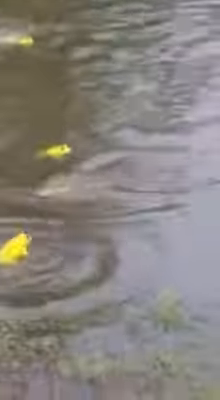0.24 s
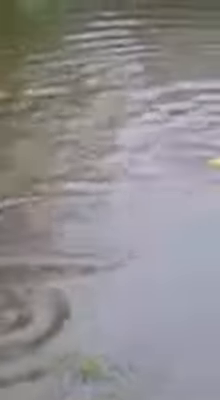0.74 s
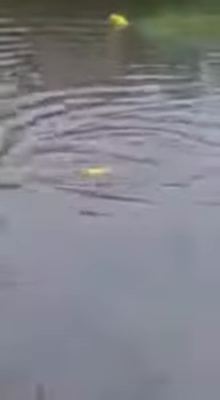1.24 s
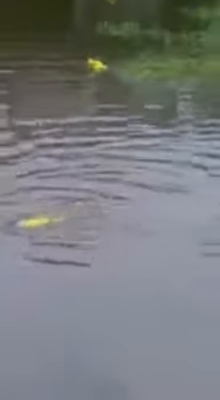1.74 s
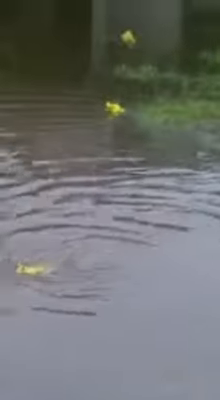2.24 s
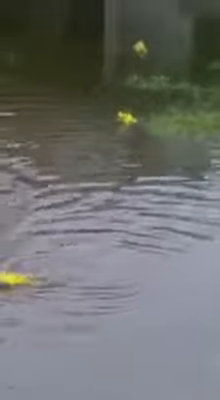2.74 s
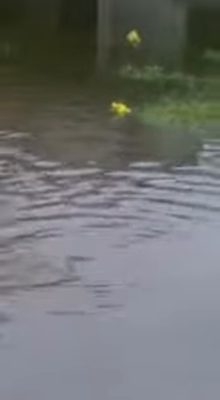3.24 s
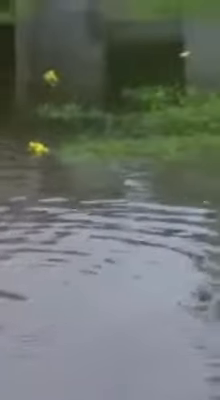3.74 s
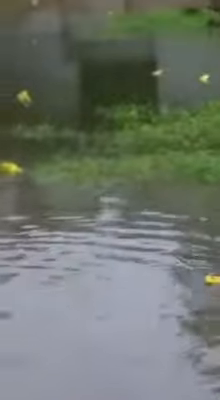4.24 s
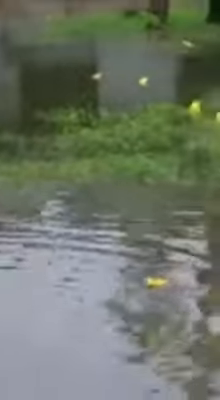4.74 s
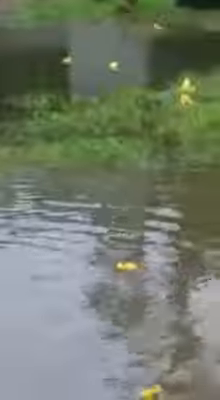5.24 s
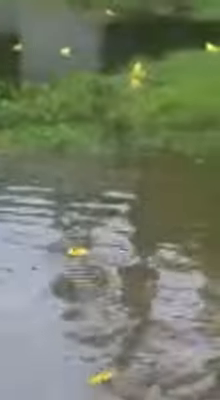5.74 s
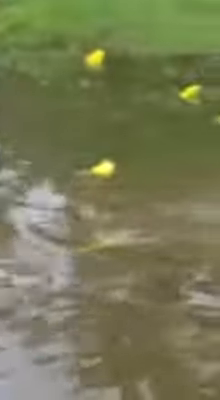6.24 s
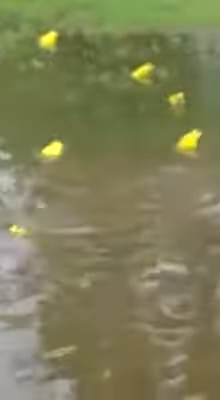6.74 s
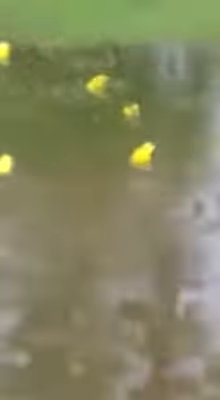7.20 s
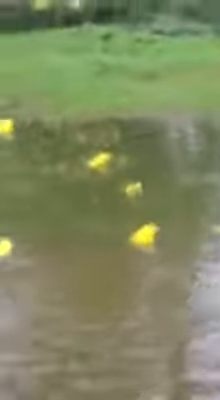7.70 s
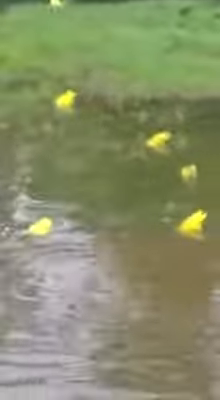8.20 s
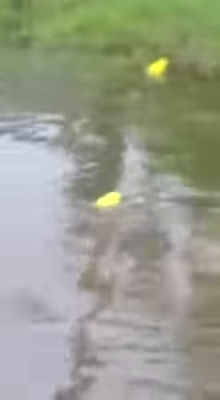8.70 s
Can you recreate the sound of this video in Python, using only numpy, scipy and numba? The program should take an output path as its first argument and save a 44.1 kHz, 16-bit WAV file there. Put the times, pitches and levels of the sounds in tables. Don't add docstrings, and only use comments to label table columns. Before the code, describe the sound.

Outdoor pond full of yellow frogs, heard on a hand-held phone. Croaking is under way immediately: short, rattling, mid-pitched honks from larger and smaller frogs, crowded at first, thinning briefly around four seconds, then thickening again. Behind them a reverberant carpet swells and dips. High thin insect rasp, soft rustle and low air rumble continue. A blunt handling knock comes just after seven seconds, a barely audible one later, while croaks go on to the end.

```python
import sys
import numpy as np
from scipy import signal
from scipy.fft import rfft, irfft
from scipy.io import wavfile
from scipy.ndimage import uniform_filter1d
from numba import njit

SR = 44100
rng = np.random.default_rng(int(sys.argv[2]) if len(sys.argv) > 2 else 0)


def gain_from_db(level_db):
    decades = np.asarray(level_db, float) / 20
    return 10 ** decades


def persist_wave(psi):
    counts = np.round(np.clip(psi, -1, 1) * 32767).astype(np.int16)
    wavfile.write(sys.argv[1], SR, np.atleast_2d(counts).T)


N = 395136
SECONDS = np.arange(N) / SR


# first click in seconds, click rate in Hz, length in seconds, level in dB,
# throat against sac in dB.
LARGE_NEAR_CROAKS = [
    (.124, 66.5, 0.28, -31, -11.5),
    (.941, 62.6, 0.17, -31.5, -13),
    (1.504, 69, 0.14, -40, -15),
    (1.746, 59.53, 0.25, -26, -9.5),
    (2.523, 55.9, 0.14, -29.5, -8.5),
    (4.43, 61.34, .25, -37, -11),
    (8.311, 65.7, 0.2, -32.5, -14),
    (8.835, 58.9, 0.093, -32, -14),
]
LARGE_FACING_CROAKS = [
    (.426, 59.7, .27, -30, -11),
    (1.156, 63.1, .25, -29, -7),
    (2.301, 57.98, .29, -33, -8),
    (4.4, 64.33, 0.18, -33, -5.5),
    (4.739, 63.5, 0.099, -37.5, -14.5),
    (4.962, 63.8, .19, -32.5, -5.5),
    (5.473, 63.83, 0.25, -30.5, -8),
    (6.022, 60.37, 0.22, -33.5, -13),
    (6.316, 65.5, 0.21, -32, -7),
    (6.809, 63.5, 0.23, -30.5, -9.5),
]
LARGE_MID_CROAKS = [
    (.708, 65.55, .17, -35.5, -8.5),
    (2.747, 54.5, 0.12, -34.5, -21),
    (2.912, 58.5, 0.13, -40.5, -10.5),
    (3.17, 60.53, 0.16, -34.5, -11.5),
    (3.447, 62.96, .26, -39.5, -7),
    (4.188, 62.2, 0.21, -34, -11),
    (6.585, 62.35, 0.15, -41.5, -9),
    (7.573, 59.1, 0.29, -36.5, -10),
    (8.529, 58.6, 0.19, -35.5, -7.5),
]
LARGEST_CROAKS = [
    (2.094, 59.5, 0.22, -37, -6),
    (5.33, 60.3, 0.14, -48, -1),
    (5.751, 64.43, 0.25, -37, -10),
    (7.2, 59.1, 0.1, -38, -2.5),
    (8.1, 58.3, 0.2, -46, 5.5),
    (8.271, 57.3, .22, -43, 3.5),
]
SMALL_NEAR_CROAKS = [
    (.153, 64.2, 0.24, -34, -7),
    (.426, 62.4, .24, -29.5, -7),
    (0.946, 59.4, 0.2, -31.5, -9),
    (1.191, 65.8, 0.2, -31.5, -15.5),
    (1.475, 62.8, 0.28, -31, -14.5),
    (2.0, 66.8, .29, -29.5, -14),
    (2.392, 60.4, 0.4, -33.5, -6.5),
    (5.447, 62.1, .25, -29, -7),
    (6.554, 62.16, 0.23, -30, -14),
    (7.391, 61.3, 0.26, -37.5, -7.5),
]
SMALL_FACING_CROAKS = [
    (1.748, 62.34, 0.28, -35.5, -3),
    (3.129, 67.2, 0.18, -31.5, -16.5),
    (3.592, 67.77, 0.23, -33.5, -11),
    (3.909, 70.8, 0.081, -46.5, -0.5),
    (4.147, 65.76, 0.21, -31.5, -24),
    (5.194, 63.75, 0.17, -32, -18),
]
SMALL_MID_CROAKS = [
    (2.953, 59.4, .16, -36.5, -10),
    (3.472, 56.6, 0.11, -43, -4.5),
    (3.866, 65.4, 0.24, -37, -5),
    (4.448, 63.8, 0.11, -40.5, -5),
    (5.026, 63.4, 0.11, -39, -16.5),
    (6.841, 64.5, 0.14, -36.5, -9),
    (7.073, 65.5, .12, -36.5, -7),
    (7.135, 59.76, 0.23, -38, -2.5),
    (8.119, 64.3, 0.13, -36.5, -3.5),
    (8.535, 63.4, 0.27, -32.5, -13),
]
MIDDLING_CROAKS = [
    (4.711, 65.5, 0.22, -37.5, -7.5),
    (5.763, 62, 0.21, -31, -14),
    (6.04, 60, 0.15, -35, -9),
    (6.32, 58.44, 0.18, -34.5, -11),
    (7.6, 62.3, 0.19, -40, -6),
    (7.778, 62.46, 0.22, -32, -12),
]
# sac resonance in Hz, throat resonance in Hz, chest in dB, head in dB.
FROG_GROUPS = [
    (1436, 385, 2, -4),
    (1500, 385, 1, 2),
    (1455, 385, -2, -7),
    (1314, 350, 3, 7.5),
    (1846, 400, -3, -8),
    (1786, 400, 0, 1),
    (1908, 400, -1, -7),
    (1614, 390, -1.5, -4.5),
]
USUAL_THROAT_DB, CHEST_PER_THROAT = -8.5, 0.55
ECHO_DB, ECHO_PER_DB = -13, -.5


def near_frogs():
    out = np.zeros((1, N))
    croaks = (LARGE_NEAR_CROAKS, LARGE_FACING_CROAKS, LARGE_MID_CROAKS, LARGEST_CROAKS,
              SMALL_NEAR_CROAKS, SMALL_FACING_CROAKS, SMALL_MID_CROAKS, MIDDLING_CROAKS)
    for calls, (sac_hz, throat_hz, chest_db, head_db) in zip(croaks, FROG_GROUPS):
        for s, rate, length, db, throat_db in calls:
            train = clicks(length, rate, jitter_s=.0002, scatter_db=2, flutter_s=.0023, flutter_db=-9)
            filling_hz = sac_hz * np.linspace(1.03, .97, train.shape[1])
            turned_db = CHEST_PER_THROAT * (throat_db - USUAL_THROAT_DB)
            call = voice(train, filling_hz, throat_db, chest_db + turned_db, head_db, throat_hz)
            wet_db = ECHO_DB + ECHO_PER_DB * (db + 30)
            add(out, s - .0072, gain_from_db(db) * echoes(call, .15, wet_db))
    return out[0]


THROAT_LEAD = 190


def clicks(length_s, rate, jitter_s, scatter_db, flutter_s, flutter_db):
    chance = rng.standard_normal((40, 6))
    count = int(np.clip(length_s * rate, 2, 40))
    chance = chance[:count]
    step = np.arange(count)
    swell = np.sin(np.pi * (step + 1) / (count + .6)) ** .7
    beat = .006 + step / rate + .00005 * (step - count / 2) ** 2
    out = np.zeros((2, int((length_s + .06) * SR)))
    breath_s = beat + .4 * jitter_s * chance[:, 0]
    out[0, (breath_s * SR).astype(int) - THROAT_LEAD] = swell ** .5 * gain_from_db(-6 * step / count)
    for k in range(3):
        snap_s = beat + jitter_s * chance[:, 0] + (k - 1) * flutter_s * (1 + .25 * chance[:, k])
        at = np.clip(snap_s * SR, 0, out.shape[1] - 1).astype(int)
        out[1, at] += swell * gain_from_db(scatter_db * chance[:, 3 + k] + abs(k - 1) * flutter_db)
    return out


# frequency in Hz, width in Hz, level in dB.
CHEST_MODES = [(873, 390, -18), (1038.6, 360, -10)]
HEAD_MODES = [(2115, 500, -10.5), (2635, 590, -21.5), (3773, 400, -31.5), (2297, 2800, -32)]
THROAT_HZ, THROAT_WIDTH_HZ = 399, 220
SAC_WIDTH_HZ, OVERTONE_WIDTH_HZ, OVERTONE_DB = 310, 260, -15


def voice(train, sac_hz, throat_db, chest_db, head_db, throat_hz=THROAT_HZ):
    breath, snaps = train
    sac = twice(snaps, sac_hz, SAC_WIDTH_HZ)
    unit = np.sqrt(np.mean(sac ** 2))
    throat = twice(breath, throat_hz, THROAT_WIDTH_HZ)
    throat = twice(throat, throat_hz, 2 * THROAT_WIDTH_HZ)
    throat = level(throat, 0) * gain_from_db(throat_db) * unit
    chest = gain_from_db(chest_db) * modes(snaps, CHEST_MODES)
    overtone = gain_from_db(OVERTONE_DB) * twice(snaps, 1800 + sac_hz, OVERTONE_WIDTH_HZ)
    head = gain_from_db(head_db) * (overtone + modes(snaps, HEAD_MODES[1:])) + modes(snaps, HEAD_MODES[:1])
    return (sac + throat + chest + head) / unit


def echoes(x, t60_s, wet_db):
    t = SECONDS[:SR // 5]
    tail = rng.standard_normal(len(t)) * gain_from_db(-60 * t / t60_s) * np.clip(t / 0.0021, 0, 1)
    tail *= gain_from_db(wet_db) / np.linalg.norm(tail)
    tail[0] = 1
    return signal.fftconvolve(np.atleast_2d(x), tail[None], axes=1)


# time in seconds, level in dB, sac resonance in Hz.
FAR_CHORUS = [(0, -19.5, 1836), (.1, -29, 1500), (.6, -23, 1587), (1.05, -29.5, 1500), (1.3, -24.5, 1482),
              (1.75, -22, 1555), (2.4, -23, 1450), (2.9, -29.5, 1500), (3.7, -27.5, 1570),
              (4.4, -31.5, 1500), (4.85, -24, 1738), (5.4, -27, 1578), (6.1, -22, 1695), (6.9, -26, 1611),
              (7.5, -29.5, 1819), (8.05, -25.5, 1744), (8.7, -25, 1708), (8.96, -22, 1617)]
# middle in seconds, depth in dB, length in seconds.
POND_LULLS = [(0.074, -8, 0.1), (0.392, -7, .1), (0.888, -2, 0.027), (1.438, -9, 0.084), (1.976, -8, 0.15),
              (3.342, 0, 0.16), (4.393, -10.5, .16), (4.926, -3.5, 0.16), (5.696, -6.5, 0.072),
              (6.277, -4.5, 0.12), (6.516, -6, 0.054), (6.778, -3, .1), (7.068, -2.5, 0.035),
              (7.304, 0.5, 0.04)]
FAR_USUAL_DB, FAR_USUAL_HZ = -27, 1646
FAR_THROAT_DB, THROAT_STEADY = -12, .35
FAR_CHEST_DB, CHEST_DB_PER_HZ = -1.5, -.015
FAR_HEAD_DB, HEAD_SWELL = -9.5, 0.28


def far_frogs():
    db, sac_hz = columns(FAR_CHORUS)
    for s, depth, length in POND_LULLS:
        db = db + depth * np.exp(-(2 * (SECONDS - s) / length) ** 2)
    throat_db = FAR_THROAT_DB - THROAT_STEADY * (db - FAR_USUAL_DB)
    chest_db = FAR_CHEST_DB + CHEST_DB_PER_HZ * (sac_hz - FAR_USUAL_HZ)
    head_db = FAR_HEAD_DB + HEAD_SWELL * (db - FAR_USUAL_DB)
    out = 0
    for size in (.94, 1.07):
        train = np.full((2, N), 1e-9)
        for s, pace, far in zip(np.arange(0, 9.1, .11), *rng.random((83, 2)).T):
            call = clicks(.22, 57 + 11 * pace, jitter_s=.0004, scatter_db=3, flutter_s=.003, flutter_db=-6)
            add(train, s - .15, gain_from_db(-8 * far) * echoes(call, t60_s=.2, wet_db=-0.5))
        train /= np.sqrt(uniform_filter1d(train ** 2, size=6000, axis=1) + 1e-9)
        out = out + voice(train, size * sac_hz, throat_db, chest_db, head_db)
    return gain_from_db(db - 5.5) * out


# start in seconds, level in dB, ring in Hz, 60 dB decay time in seconds.
FINGER_TAPS = [
    (7.2335, -11, 220, .016),
    (7.2336, -13, 600, .008),
    (7.2432, -11, 150, .024),
    (7.2433, -11, 500, .009),
    (7.244, -13, 110, .04),
    (8.14, -33, 65, .1),
]


def taps():
    out, t = np.zeros(N), SECONDS[:SR // 5]
    for s, db, hz, t60 in FINGER_TAPS:
        swing = np.cos(2 * np.pi * hz * t) * gain_from_db(-60 * t / t60) * np.clip(t / .0004, 0, 1)
        add(out, s - .0005, gain_from_db(db) * swing)
    return out


# start in seconds, length in seconds, level at start in dB, level at end in dB.
KATYDID_PHRASES = [(-.1, .13, -48, -45), (0.195, 0.96, -46.5, -45.5), (1.271, 1.02, -48.5, -44.5),
                   (2.38, 0.58, -48, -50.5), (2.87, 0.59, -44.5, -49), (3.53, 0.62, -50, -50),
                   (3.974, 0.62, -46.5, -48), (4.727, 1.04, -50, -47.5), (5.93, .95, -52, -49.5),
                   (7.06, .83, -54, -56.5), (8.588, .2, -55, -54)]
# frequency in Hz, level in dB.
RASP_SPECTRUM = [(8100, -34), (8250, -7), (8700, -6), (9000, -1.5), (9400, 1.5), (9800, -3), (10300, -13.5),
                 (10800, -36.5)]
RASP_REST_DB, RASP_EDGE_S = -53, 0.037
RASP_FLICKER_DB, RASP_FLICKER_S = -0.06, .08


def katydids():
    power = gain_from_db(2 * RASP_REST_DB)
    for s, length, first_db, last_db in KATYDID_PHRASES:
        gate = np.clip(np.minimum(SECONDS - s, s + length - SECONDS) / RASP_EDGE_S, 0, 1)
        phrase_db = np.interp(SECONDS, (s, s + length), (first_db, last_db))
        power = power + gate * gain_from_db(2 * phrase_db)
    flicker = gain_from_db(RASP_FLICKER_DB * wander(RASP_FLICKER_S))
    return np.sqrt(power) * flicker * coloured(RASP_SPECTRUM)


# start in seconds, peak in dB, centre in Hz, length in seconds.
WATER_TICKS = [(0.64, -46, 7050, 0.035), (2.495, -48, 7000, 0.035), (2.54, -39, 4680, 0.015),
               (0.295, -51.5, 6900, 0.069), (3.223, -52, 6740, .06), (4.19, -54, 6550, 0.051),
               (7.236, -38.5, 9300, .015), (4.172, -41.5, 5830, .03), (6.19, -50, 4570, 0.088),
               (6.553, -49, 4700, 0.068), (6.878, -50, 4660, 0.14), (7.232, -34, 6460, 0.012),
               (7.326, -43, 6400, 0.029), (7.447, -47, 4540, 0.16), (7.864, -46, 4420, 0.21),
               (8.084, -38, 6500, 0.0078), (8.333, -47, 4660, 0.11)]


def splashes():
    out = np.zeros(N)
    for s, db, hz, length in WATER_TICKS:
        burst = rng.standard_normal(min(int(length * SR), 8000))
        burst *= np.hanning(len(burst)) ** .3
        add(out, s, gain_from_db(db + 4) * twice(burst, hz, width_hz=hz ** 2 / 12000))
    return out


# frequency in Hz, level in dB.
RUSTLE_SPECTRUM = [(4200, 12), (5700, 11), (6300, 17.5), (7300, 16.5), (7900, -4), (8300, -5)]
RUSTLE_DB, RUSTLE_FLICKER_DB, RUSTLE_FLICKER_S = -60.5, 1, .06


def rustle():
    flicker_db = RUSTLE_FLICKER_DB * wander(RUSTLE_FLICKER_S)
    return gain_from_db(RUSTLE_DB + flicker_db) * coloured(RUSTLE_SPECTRUM)


# frequency in Hz, level in dB.
AIR_SPECTRUM = [(15, -53), (25, -32.5), (43, -13.5), (102, -10.5), (167, -15), (260, -2), (340, -3.5),
                (570, -120)]
# time in seconds, level in dB.
AIR_LEVEL = [(0, -49), (2.5, -48), (4, -45.5), (6.5, -46), (7.6, -47.5), (8.2, -45), (8.6, -47.5),
             (8.96, -52)]


def open_air():
    return gain_from_db(columns(AIR_LEVEL)[0]) * coloured(AIR_SPECTRUM)


@njit
def ring(x, hz, width):
    y, band, low, g, k = np.empty(len(x)), 0., 0., 0., 0.
    for i in range(len(x)):
        if i % 16 == 0:
            g, k = np.tan(np.pi * hz[i] / SR), width / hz[i]
        v = (band + g * (x[i] - low)) / (1 + g * (g + k))
        band, low, y[i] = 2 * v - band, low + 2 * g * v, k * v
    return y


def twice(x, hz, width_hz):
    hz = hz + np.zeros(len(x))
    once = ring(x, hz, 1. * width_hz)
    return ring(once, hz, 1. * width_hz)


def modes(x, table):
    return sum(gain_from_db(db) * twice(x, hz, width) for hz, width, db in table)


def coloured(points):
    hz, db = np.transpose(points)
    f = np.fft.rfftfreq(N, 1 / SR) + 1
    gain = gain_from_db(np.interp(np.log(f), np.log(hz), db, left=-90, right=-90))
    return level(irfft(rfft(rng.standard_normal(N)) * gain, N), 0)


def wander(hold_s):
    k = int(hold_s * SR)
    steps = np.repeat(rng.standard_normal(1000), k)[:N]
    return level(uniform_filter1d(steps, k), 0)


def level(x, db):
    return x * gain_from_db(db) / np.sqrt(np.mean(x ** 2))


def columns(table):
    s, *rest = np.transpose(table)
    return [np.interp(SECONDS, s, c) for c in rest]


def add(out, s, x):
    a = max(int(s * SR), 0)
    out[..., a:a + x.shape[-1]] += x[..., :N - a]


def scene():
    soft = signal.cheby2(10, 40, 4750, fs=SR, output="sos")
    frogs = signal.sosfilt(soft, near_frogs() + far_frogs())
    treble = katydids() + rustle() + splashes()
    return (frogs + treble + taps() + open_air())[None]


# frequency in Hz, step against band level in dB.
ROUNDING_STEP = [(0, -10), (1800, -4), (2300, 5), (3400, 6), (3900, 9), (4250, 9), (4400, 12)]


def coarse_lows(x, mask_db=-15.5, whim_db=4):
    hop, lines, band = 2048, 416, 16
    n, k = np.arange(2 * hop), np.arange(lines)[:, None]
    window = np.sin(np.pi * (n + .5) / (2 * hop))
    basis = window * np.cos(np.pi / hop * (n + .5 + hop / 2) * (k + .5)) * np.sqrt(2 / hop)
    padded = np.pad(x, (hop, 2 * hop))
    starts = np.arange(0, N + hop, hop)
    c = basis @ padded[starts[None] + n[:, None]]
    rms = np.sqrt((c ** 2).reshape(lines // band, band, -1).mean(axis=1))
    hz, db = np.transpose(ROUNDING_STEP)
    band_hz = (np.arange(len(rms)) + .5) * band * SR / (2 * hop)
    share = gain_from_db(np.interp(band_hz, hz, db))[:, None]
    masked = gain_from_db(mask_db) * rms.max(axis=0) * np.minimum(share, 1)
    whim = gain_from_db(whim_db * rng.standard_normal(rms.shape))
    step = np.repeat(np.maximum(share * rms, masked) * whim, band, axis=0)
    knock = rms[0] > 5 * np.median(rms[0])
    step *= np.where(knock & (k < 190), .1, 1)
    error = basis.T @ (step * np.round(c / step - .1 * np.sign(c)) - c)
    for a, e in zip(starts, error.T):
        padded[a:a + 2 * hop] += e
    return padded[hop:hop + N]


FRAME, HOP = 512, 128
EDGE, SHIFT = 51, 44


def rebuild_treble(x, noise_share=.3, least_db=-82):
    z = signal.stft(x, nperseg=FRAME, noverlap=FRAME - HOP)[2]
    source = z[EDGE - SHIFT:EDGE]
    found = smooth(np.abs(source) ** 2, bins=4, frames=8)
    floor = gain_from_db(2 * least_db)
    flat = source / np.sqrt(found + floor)
    for lo in (EDGE, EDGE + SHIFT):
        wanted = smooth(np.abs(z[lo:lo + SHIFT]) ** 2, bins=6, frames=4)
        noise = z[lo:lo + SHIFT] * found / (found + floor)
        copy = np.sqrt((1 - noise_share) * wanted) * flat
        z[lo:lo + SHIFT] = copy + np.sqrt(noise_share) * noise
    return signal.istft(z, nperseg=FRAME, noverlap=FRAME - HOP)[1][:N]


def smooth(power, bins, frames):
    return uniform_filter1d(uniform_filter1d(power, bins, axis=0), frames, axis=1)


def band_limit(x):
    return signal.sosfilt(signal.butter(12, 11060, fs=SR, output="sos"), x)


def record(dry):
    lows = coarse_lows(dry[0])
    mix = rebuild_treble(lows)[None] - .0005
    return band_limit(mix)


dry = scene()
out = record(dry)
persist_wave(out)
```